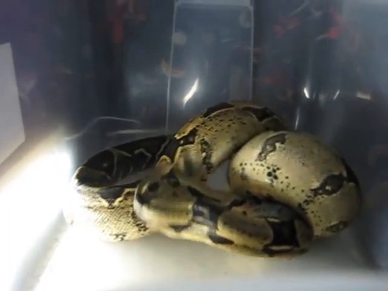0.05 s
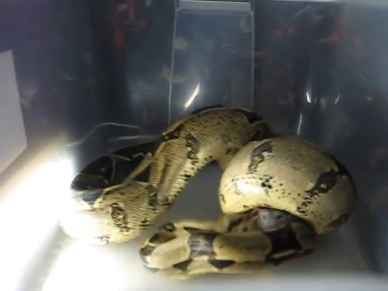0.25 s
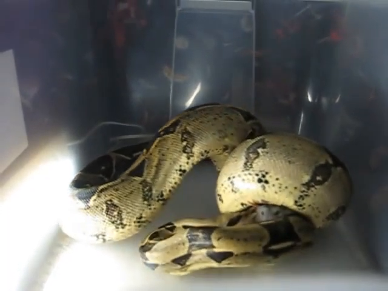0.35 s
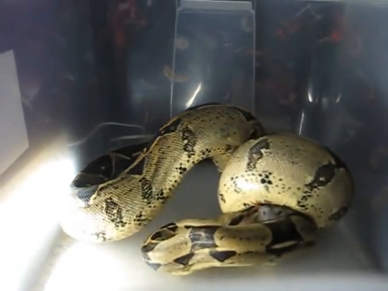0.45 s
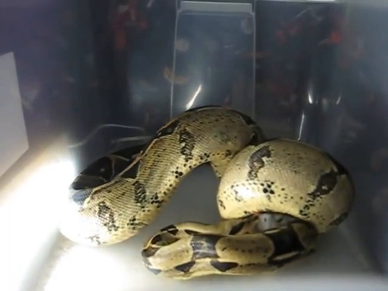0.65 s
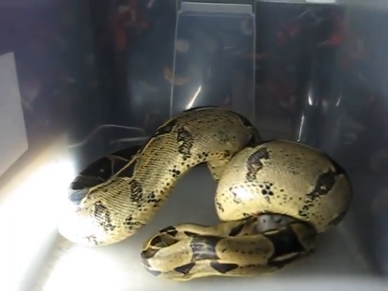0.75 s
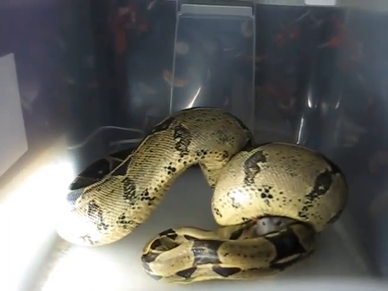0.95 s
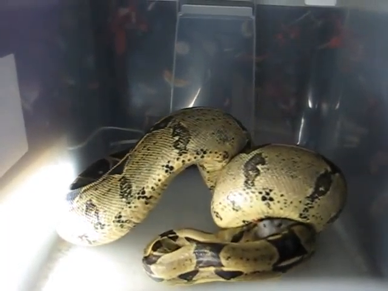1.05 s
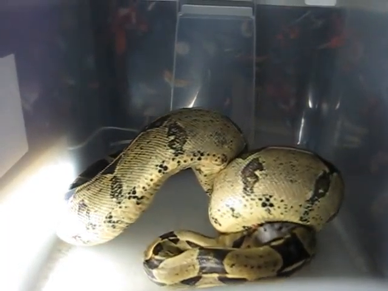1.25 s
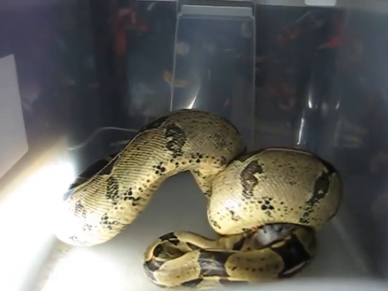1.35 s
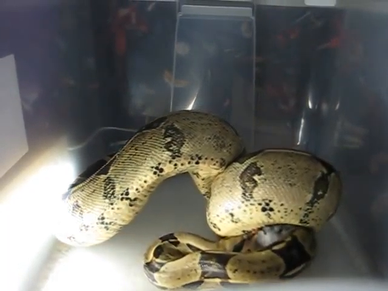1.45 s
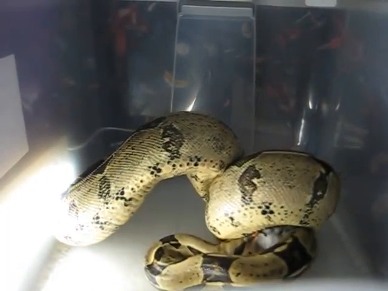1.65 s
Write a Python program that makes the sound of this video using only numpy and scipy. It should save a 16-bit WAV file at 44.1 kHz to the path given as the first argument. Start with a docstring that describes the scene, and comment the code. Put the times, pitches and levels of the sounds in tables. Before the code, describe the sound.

A hissing snake strikes a plastic tub with one sudden thump, then bumps softly around.

```python
"""A snake hisses in a plastic tub, close to a single microphone in a quiet room.
It lunges with a sharp spit of air and thumps the wall, which booms and buzzes briefly.
The tub rocks with low thuds, then the body knocks softly against it and scales slide over its floor.
Behind it is the room tone: low rumble, air noise ringing faintly in the tub, a thin electrical whine."""
import sys
import numpy as np
from scipy import signal
from scipy.fft import rfft, irfft
from scipy.io import wavfile

SR = 44100
rng = np.random.default_rng(int(sys.argv[2]) if len(sys.argv) > 2 else 0)


def store_pcm(level_fs):
    """Save levels as 16-bit WAV."""
    pcm = np.round(np.clip(level_fs, -1, 1) * 32767).astype(np.int16)
    wavfile.write(sys.argv[1], SR, np.atleast_2d(pcm).T)


N = 74970
T = np.arange(N) / SR

# The long hiss at the microphone. Each row: time in seconds, level in dB before the closing fade.
HISS_LEVEL = [(0, -41), (.085, -41), (.115, -38), (.17, -38.5), (.24, -35.5), (.28, -35.5), (.33, -45.5),
              (.4, -47.5), (.5, -54)]
# The colour of the hiss. Each row: frequency in Hz, relative noise density in dB.
HISS_SPECTRUM = [(530, -37), (900, -3), (1000, 2.5), (1120, -4), (1200, -1), (1340, -6), (2140, -2),
                 (3150, -9.5), (6480, -3.5), (15400, -20.5), (16000, -34)]
# The brighter spit of the lunge. Each row: frequency in Hz, relative noise density in dB.
SPIT_SPECTRUM = [(530, -31), (900, 1), (1420, -22), (1570, -14), (2660, -13), (3150, -14), (5160, -1.5),
                 (8870, -0.5), (12000, -5), (16000, -30)]


def hiss(end_s=.6, fade_s=.08, spit_s=.196, spit_db=-31):
    """Air through the snake's throat, close up: a long hiss, a spit in the lunge, a faint return."""
    fade = np.clip((end_s - T) / fade_s, 0, 1)
    breath = from_db(np.interp(T, *np.transpose(HISS_LEVEL))) * fade
    faint_return = from_db(-51) * swell(.86, half_s=.13)
    spit = from_db(spit_db) * swell(spit_s, half_s=np.where(T < spit_s, .008, .018))  # fast up, slower down
    return (breath + faint_return) * noise(HISS_SPECTRUM) + spit * noise(SPIT_SPECTRUM)


# Blows of the snout on the tub wall. Each row: start in seconds, relative level in dB.
SNOUT_BLOWS = [(0.2258, 1.5), (0.2372, -24)]
# The buzz of the struck plastic. Each row: frequency in Hz, relative noise density in dB.
BUZZ_SPECTRUM = [(300, -9), (600, -2), (1000, -5), (2200, 3), (2800, -8), (3600, -14.5), (4300, -12),
                 (5300, -7.5), (7300, -9), (9000, -16.5), (12000, -18), (16000, -37)]


def strike(buzz_db=-22, buzz_attack_s=.0003, buzz_t60_s=.1):
    """The snout hits the wall: the tub booms, the plastic buzzes, then rattles as it swings back."""
    force, envelope = 0, 0
    for start, db in SNOUT_BLOWS:
        age = np.maximum(T - start, 0)
        attack = 1 - np.exp(-age / buzz_attack_s)
        force += from_db(db) * click(start)
        envelope += from_db(db) * attack * np.exp(-np.log(1000) * age / buzz_t60_s)
    buzz = noise(BUZZ_SPECTRUM) + from_db(-8.5) * ringing_noise(hz=5160, t60=.015)
    rattle = from_db(-30) * swell(.26, half_s=.0031) * ringing_noise(hz=1960, t60=.015)
    return tub(force, ring_scale=.95) + from_db(buzz_db) * envelope * buzz + rattle


# The tub rocks with low thuds after the strike, then the body knocks softly against it. Each row:
# start in seconds, relative knock level in dB, brightness in Hz, thud level in dB, thud pitch in Hz.
THUDS_AND_KNOCKS = [(0.2597, -29, 900, -17, 94), (0.301, -45, 606, -24.5, 87.5),
                    (0.3317, -19, 1500, -30, 171), (.455, -20, 2260, -30.5, 181), (0.5, -40, 686, -35, 79),
                    (.518, -35, 1800, -41.5, 234), (.616, -38, 1310, -33.5, 90), (0.661, -52, 700, -33, 99),
                    (.860, -49, 700, -34, 87), (1.3648, -30.5, 1600, -64, 101)]


def knocks(slap_hz=1040, slap_db=8.5, echo_s=.00383, echo_db=-4.5, ring_db=-5.5):
    """Each soft contact gives a slap, its duller echo off a nearby surface, a short ring and a thud."""
    force, thuds = 0, 0
    for start, db, bright_hz, thud_db, thud_hz in THUDS_AND_KNOCKS:
        contact = lowpass(click(start), bright_hz)
        force += from_db(db) * lowpass(contact, bright_hz)
        thuds += from_db(thud_db) * ring(contact, thud_hz, t60=.065)
    slap = np.gradient(ring(force, slap_hz, t60=.0018)) * SR / (2 * np.pi * slap_hz)
    echo = from_db(echo_db) * lowpass(np.interp(T - echo_s, T, slap), hz=1090)
    damped = tub(force, ring_scale=.79)  # the body leans on the plastic and shortens its ring
    return from_db(ring_db) * damped + from_db(slap_db) * (slap + echo) + thuds


# Strokes of the scales on the tub floor. Each row: middle in seconds, half length in seconds, level in dB.
SLIDE_STROKES = [(0.01, 0.052, -44), (0.204, 0.014, -39), (.41, 0.041, -44), (0.511, 0.039, -48.5),
                 (0.634, 0.03, -46), (0.894, 0.076, -53.5), (1.368, .01, -49)]
# The colour of scales on plastic. Each row: frequency in Hz, relative noise density in dB.
SLIDE_SPECTRUM = [(200, -10), (500, -3.5), (1000, -2.5), (1500, 1.5), (2200, -4), (3000, -14), (8000, -23)]


def slides(grain_db=5, grain_hz=173, ring_db=-6):
    """Scales rub the floor in grainy strokes that also stir the tub's modes."""
    level = sum(from_db(db) * swell(middle, half_s) for middle, half_s, db in SLIDE_STROKES)
    friction = noise(SLIDE_SPECTRUM)
    grain = rms_one(lowpass(rng.standard_normal(N), grain_hz))
    rub = rms_one(friction * from_db(grain_db * grain))
    return level * (rub + from_db(ring_db) * rms_one(tub(rub, ring_scale=1)))


# The modes of the tub around the snake. Each row: frequency in Hz, level in dB before weighting,
# ring time (t60) in seconds before scaling.
TUB_MODES = [(94.7, -16, 0.091), (131, -5.5, 0.044), (223.5, -20, 0.086), (280, -22.5, 0.085),
             (405, -16, 0.026), (508.7, -10, 0.053), (559.5, -15.5, 0.079), (700.4, -17.5, 0.1),
             (950, -27, 0.16), (1043, -25, 0.11), (1121, -24, 0.1), (1261, -30.5, 0.091),
             (1376, -28.5, 0.14), (1582, -22.5, 0.11), (1706, -29, 0.13), (1850, -27, 0.16),
             (1952, -24, 0.098), (2075, -22, .13), (2192, -25, 0.088), (2317, -34, 0.15), (2600, -29, .09)]


def tub(force, ring_scale, ring_stretch=1.11, boom_below_hz=300, clatter_above_hz=800, spread_s=.00401):
    """A force rings the tub: lower modes move at once, upper ones a little late as the blow spreads."""
    out = np.zeros(N)
    for k, (hz, db, t60) in enumerate(TUB_MODES):
        boom, clatter = hz < boom_below_hz, hz > clatter_above_hz
        chance = rng.random()
        lag = int(chance * spread_s * SR) if clatter else 0
        sign = (-1) ** k if boom or clatter else -1  # low and high neighbours swing in opposition
        weight_db = 3.4 if boom else -2.7 if clatter else 1.2
        mode = ring(force, hz, t60 * ring_scale * ring_stretch)
        out[lag:] += sign * from_db(db + weight_db) * mode[:N - lag]
    return highpass(out, hz=55, order=2)  # the tub hardly radiates below this


def room(x, t60_s=.18, gap_s=.008):
    """The room's short diffuse tail, reaching the microphone just after the direct sound."""
    tail = rng.standard_normal(N) * np.exp(-np.log(1000) * T / t60_s) * (T > gap_s)
    return signal.fftconvolve(x, tail / np.sqrt(np.sum(tail ** 2)))[:N]


# The air of the room behind the tub. Each row: frequency in Hz, relative noise density in dB.
AIR_SPECTRUM = [(25, -28), (45, -6), (65, 2), (95, 0.5), (145, -4.5), (180, -13.5), (240, -6.5),
                (350, -17.5), (500, -9.5), (630, -20), (900, -11), (1300, -13.5), (2200, -15.5),
                (3100, -20), (6000, -21.5), (7800, -23), (12600, -29.5), (14400, -29), (15500, -30),
                (16500, -44)]
# Narrow hums in the room. Each row: frequency in Hz, width in Hz, rms level in dB.
ROOM_HUMS = [(690, 9.3, -59), (799, 5, -60), (916, 26, -57)]


def room_tone(air_db=-45, rumble_db=-53.5, tub_db=-53.5):
    """The quiet room: air, a low rumble, noise ringing in the tub and narrow hums."""
    hums = sum(from_db(db) * ringing_noise(hz, t60=np.log(1000) / (np.pi * width))
               for hz, width, db in ROOM_HUMS)
    tub_ring = from_db(tub_db) * rms_one(tub(rng.standard_normal(N), ring_scale=.45))
    air = from_db(air_db) * noise(AIR_SPECTRUM)
    rumble = from_db(rumble_db) * ringing_noise(hz=93, t60=.08)
    return air + rumble + tub_ring + hums


# The electrical whine in the background. Each row: frequency in Hz, rms level in dB.
WHINE_TONES = [(7562, -63.5), (15148, -62)]


def whine(flutter_hz=30.3, depth_rad=.42):
    """Two thin electrical tones with a quick flutter in pitch."""
    flutter = depth_rad * np.sin(2 * np.pi * flutter_hz * T)
    return sum(from_db(db) * np.sqrt(2) * np.sin(2 * np.pi * hz * T + flutter) for hz, db in WHINE_TONES)


def from_db(db):
    """Decibels to gain."""
    return 10 ** (np.asarray(db) / 20)


def rms_one(x):
    """Scale to unit power."""
    return x / np.sqrt(np.mean(x ** 2) + 1e-20)


def lowpass(x, hz):
    """Two-pole low-pass."""
    return signal.sosfilt(signal.butter(2, hz, fs=SR, output="sos"), x)


def highpass(x, hz, order):
    """High-pass with a given number of poles."""
    return signal.sosfilt(signal.butter(order, hz, "high", fs=SR, output="sos"), x)


def noise(spectrum):
    """Unit noise of a given colour, falling away below its lowest point."""
    hz, db = np.transpose(spectrum)
    bins_hz = np.maximum(np.arange(N // 2 + 1) * SR / N, 1)
    colour = from_db(np.interp(np.log(bins_hz), np.log(hz), db))
    rolloff = np.minimum(bins_hz / hz[0], 1) ** 2
    return rms_one(irfft(rfft(rng.standard_normal(N)) * colour * rolloff, N))


def click(s):
    """A unit impulse at a given time."""
    return signal.unit_impulse(N, int(s * SR)) + 1e-18


def ring(x, hz, t60):
    """One resonance: a unit click starts a sine of height 1 that falls 60 dB in t60 seconds."""
    decay, angle = np.exp(-np.log(1000) / (t60 * SR)), 2 * np.pi * hz / SR
    return signal.lfilter([0, np.sin(angle)], [1, -2 * decay * np.cos(angle), decay * decay], x)


def ringing_noise(hz, t60):
    """Unit noise in one resonance, already running."""
    return rms_one(ring(rng.standard_normal(2 * N), hz, t60)[N:])


def swell(s, half_s):
    """A smooth rise and fall about a given time in seconds."""
    return np.exp(-.5 * ((T - s) / half_s) ** 2)


def scene(room_db=-17.5):
    """One channel, near the tub: the snake in front, the room well behind it."""
    blows = strike() + knocks()
    tail = from_db(room_db) * room(blows)
    return (blows + tail + hiss() + slides() + room_tone() + whine())[None]


def record(dry, low_cut_hz=35, high_cut_hz=16600):
    """The microphone loses the deepest bass, clips at full scale and cuts the top."""
    clipped = np.clip(highpass(dry, low_cut_hz, order=1), -1, 1)
    return signal.sosfilt(signal.ellip(10, .1, 80, high_cut_hz, fs=SR, output="sos"), clipped)


dry = scene()
out = record(dry)
store_pcm(out)
```